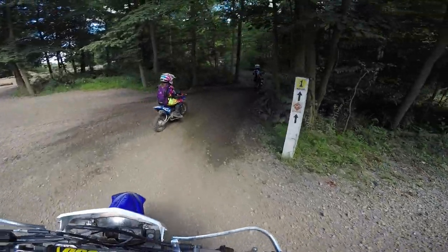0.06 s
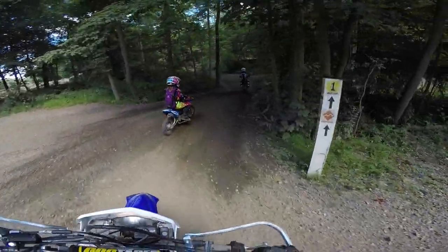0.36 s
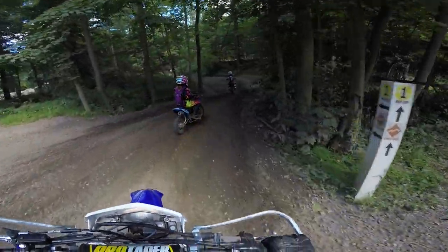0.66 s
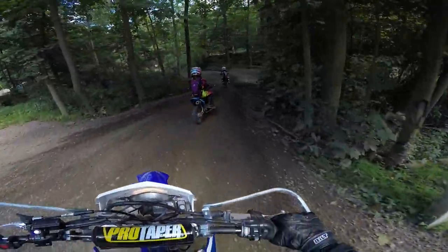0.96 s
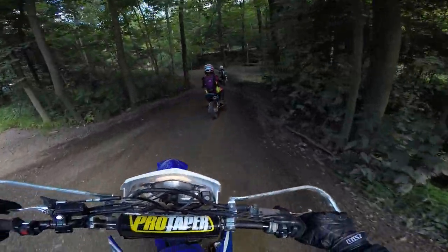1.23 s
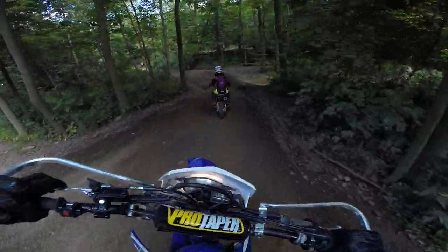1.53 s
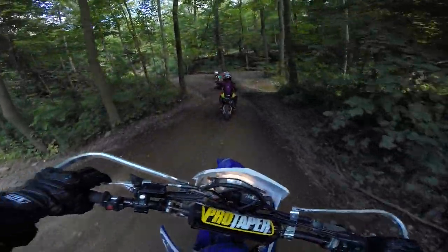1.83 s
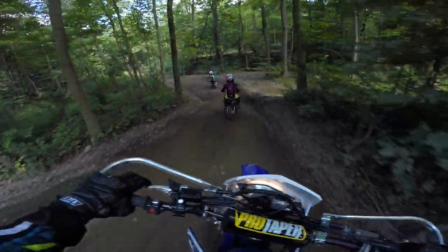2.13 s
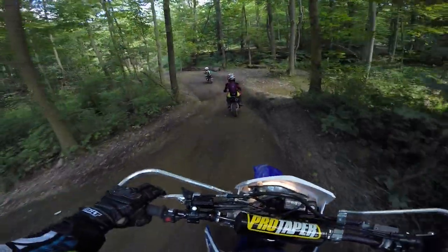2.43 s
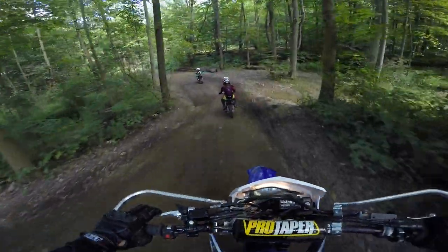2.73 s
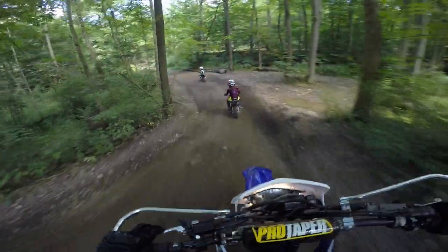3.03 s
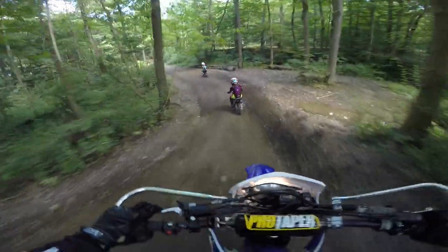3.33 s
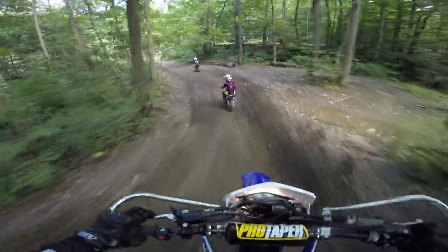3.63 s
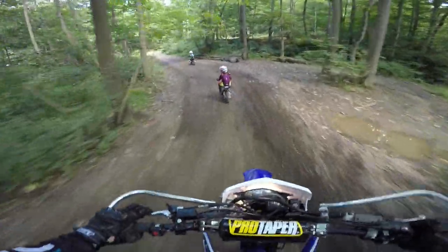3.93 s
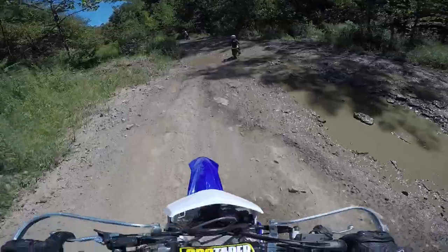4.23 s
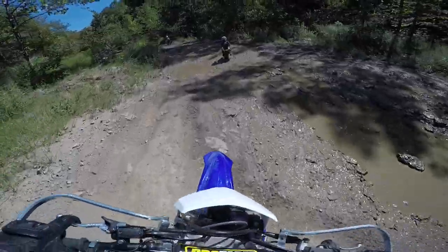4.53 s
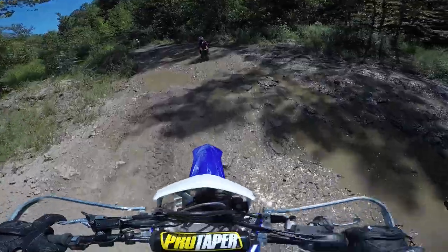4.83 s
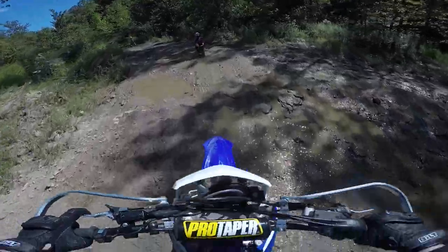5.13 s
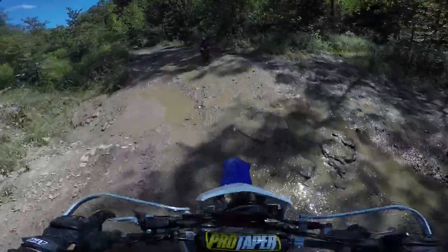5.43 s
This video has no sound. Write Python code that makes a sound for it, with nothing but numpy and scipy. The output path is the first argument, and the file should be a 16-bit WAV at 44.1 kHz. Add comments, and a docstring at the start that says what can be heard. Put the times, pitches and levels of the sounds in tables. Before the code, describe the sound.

Muffled, thumping putter of a single-cylinder dirt bike heard from the rider's helmet, with wind rumble, faint tyre hiss and light metal ticks.

```python
"""Dirt bike on a gravel trail

A single-cylinder four-stroke putters along, heard through a muffled helmet camera. Each burn thumps in
the exhaust, the hardest overload the microphone, and the intake gulps after every firing. Wind rumbles,
the chassis hums, tyres hiss and metal on the wheel ticks.
At 4.17 s the sound jumps abruptly, with a sharp click, to a rougher, stonier stretch."""
import sys
import numpy as np
from scipy import signal
from scipy.fft import rfft, irfft, next_fast_len
from scipy.io import wavfile

SR = 44100
rng = np.random.default_rng(int(sys.argv[2]) if len(sys.argv) > 2 else 0)


def waveform_to_disk(signal):
    """Save audio, clipped to [-1, 1], as 16-bit WAV at the path in sys.argv[1]."""
    frames = np.transpose(np.atleast_2d(signal))
    scaled = np.clip(frames, -1, 1) * 32767
    samples = np.round(scaled).astype(np.int16)
    wavfile.write(sys.argv[1], SR, samples)


N = 250047
TIME_S = np.arange(N) / SR
JUMP_S = 4.167

# steady camera case rings: freq_hz, width_hz, rms_db
CASE_RINGS = [(2830, 19, -71.5), (3130, 37, -80.5), (6360, 43, -78), (12617, 6, -85)]
# relative levels along the trail: time_s, wind_db, chassis_db, gravel_db
TRAIL_LEVELS = [(0, -21.5, -48.5, -54), (1.15, -21.5, -47, -52.5), (1.65, -28.5, -48, -52.5),
                (2.75, -21, -50, -53.5), (3.2, -20.5, -48.5, -53.5), (4.1, -24, -47, -52.5),
                (4.2, -22, -45, -50), (4.72, -18, -45.5, -47), (5.05, -28, -50, -50),
                (5.38, -20.5, -48.5, -52), (5.67, -24, -46.5, -49)]
# noise spectra: freq_hz, density_db
WIND_SPECTRUM = [(12, -28), (28, -7), (50, 1.5), (100, -3.5), (140, 7), (200, -3.5), (270, -0.5),
                 (330, -14), (380, -28), (600, -71)]
CHASSIS_SPECTRUM = [(200, -13), (330, 1.5), (420, 1), (470, -2.5), (530, -15), (700, -16.5), (1100, -22),
                    (1600, -36.5), (3000, -48)]
GRAVEL_SPECTRUM = [(600, -8), (1600, -10.5), (2200, 2), (2700, -2), (3700, 1), (4800, 6), (5300, -5.5),
                   (7500, -10), (8700, -19.5), (9500, -18.5), (12000, -30), (15000, -37.5)]
# resonances: freq_hz, width_hz, gain_db
CASE_MODES = [(2160, 420, -9.5), (3440, 86, -2.5), (3850, 300, 1.5), (4410, 260, 5), (4920, 55, -0.5),
              (6640, 140, -12.5), (9340, 390, -13)]
AIRBOX_MODES = [(270, 35, 0), (162, 130, -16.5)]
EXHAUST_MODES = [(261.2, 46.2, 4.5), (187.6, 23.5, 4), (69, 18, -14.5)]

# bouts of wheel ticking: start_s, length_s, first_db, last_db
TICK_BOUTS = [(0.04, 0.25, -32.5, -46.5), (0.3, .17, -44.5, -31.5), (1.079, 0.22, -31, -47),
              (4.188, 0.029, -37.5, -33.5), (4.328, 0.2, -34, -32.5), (4.59, 0.081, -36.5, -38),
              (4.884, 0.067, -31, -31), (5.053, .44, -37, -32.5), (5.554, .09, -36.5, -28.5)]
# tick pace, set by the wheel: time_s, ticks_per_s
TICK_RATE = [(0, 26.9), (1.3, 26.3), (4.3, 35), (5.67, 35.9)]
# main ring of a tick: time_s, pitch_hz
TICK_PITCH = [(0, 4440), (1.3, 4330), (4.2, 4520), (5.67, 4640)]
# lower tick rings, smooth stretch only: freq_hz, gain_db
TICK_LOW_MODES = [(2900, -11.5), (2000, -17)]

# engine speed: time_s, firings_per_s
FIRING_RATE = [(0.0, 20.28), (0.526, 20.772), (0.609, 19.881), (1.117, 22.595), (1.51, 22.263),
               (1.78, 25.398), (2.25, 20.761), (2.6, 24.413), (2.945, 21.055), (3.57, 21.557),
               (3.968, 24.253), (4.278, 24.808), (4.415, 23.105), (4.876, 24.299), (5.006, 31.381),
               (5.204, 24.233), (5.438, 21.931), (5.67, 32.498)]
# frame vibration: time_s, level_db
FRAME_SHAKE = [(0, -29), (1.8, -27.5), (2.35, -32), (3.7, -27.5), (4.5, -19), (4.83, -22.5), (5.04, -29.5),
               (5.18, -25), (5.67, -41)]
# airbox suction: time_s, level_db
SUCTION = [(0, -22.5), (4.15, -21), (4.19, -17), (4.76, -11), (4.85, -19.5), (5.67, -19.5)]
# burn strength: time_s, level_db
THROTTLE = [(0, 1.1), (.15, -0.26), (.74, -1.12), (.81, 1.14), (1.5, 0.07), (1.68, 0.6), (1.76, -1.95),
            (2.05, 0.5), (2.62, 0), (2.72, -1.4), (3.0, -1.15), (3.05, 0.4), (3.7, 0), (3.79, -1.83),
            (4.04, -1), (4.12, 1.5), (4.2, -3), (4.7, -4), (4.92, 1.96), (5.17, -1.98), (5.5, 1.67),
            (5.67, -0.96)]
# weak burns: time_s, loss_db
MISFIRES = [(.5, 2), (.89, 7), (1.07, 4.5), (1.34, 3.5), (2.06, 3), (2.2, 4), (2.91, 1.5), (3.28, 8),
            (3.52, 8), (4.16, 4.5), (4.35, 2), (4.44, 3.5), (4.49, 6.5), (4.57, -1), (4.78, 8),
            (5.15, 16.5), (5.27, 3), (5.4, 3)]
# hard burns: time_s, gain_db
BARKS = [(.21, 1), (.36, 1.5), (.55, 1.14), (.65, 1.2), (1.81, 1.6), (2.11, 1), (2.82, 1), (2.86, 1.37),
         (3.47, 0.6), (3.56, 2), (3.83, 1.6), (3.92, 2), (4.4, 2.5), (4.61, 4.5), (4.74, 4.5), (4.82, 3.1)]


def from_db(db):
    """Decibels to gain."""
    return 10 ** (np.asarray(db) / 20)


def unit_rms(x):
    """Scale to rms 1."""
    return x / np.sqrt(np.mean(x ** 2) + 1e-20)


def curves(table):
    """Value columns of a time table, per sample."""
    time_s, *columns = np.transpose(table)
    return [np.interp(TIME_S, time_s, column) for column in columns]


def low_pass(x, cutoff_hz, order):
    """Butterworth low-pass."""
    return signal.sosfilt(signal.butter(order, cutoff_hz, fs=SR, output="sos"), x + 1e-18)


def drift(rate_hz):
    """Random wander between unit-normal knots."""
    knots = rng.standard_normal(2000)
    return np.interp(TIME_S * rate_hz, np.arange(len(knots)), knots)


def noise(spectrum):
    """Shaped noise, rms 1."""
    freq_hz, density_db = np.transpose(spectrum)
    size = next_fast_len(N)
    bins_hz = np.arange(size // 2 + 1) * SR / size
    gain = from_db(np.interp(np.log(bins_hz + 1), np.log(freq_hz), density_db))
    return unit_rms(irfft(rfft(rng.standard_normal(size)) * gain, size)[:N])


def ring(x, freq_hz, width_hz):
    """Resonator: a unit click starts a decaying sine of height 1."""
    radius, step_rad = np.exp(-np.pi * width_hz / SR), 2 * np.pi * freq_hz / SR
    return signal.lfilter([0, np.sin(step_rad)], [1, -2 * radius * np.cos(step_rad), radius ** 2], x + 1e-18)


def puff_response(modes, top_hz):
    """A soft gas puff rings a cavity; adjacent modes alternate in sign."""
    puff = low_pass(signal.unit_impulse(SR // 8), top_hz, order=6)
    return sum((-1) ** k * from_db(db) * ring(puff, hz, width) for k, (hz, width, db) in enumerate(modes))


def pulse_train(onsets, gains, pitch_ratios, response):
    """One peak-normalised response per onset sample, each at its own gain and pitch."""
    out, age = np.zeros(N + len(response)), np.arange(len(response))
    for start, gain, ratio in zip(onsets, gains, pitch_ratios):
        out[start:start + len(age)] += gain * np.interp(age * ratio, age, response, right=0)
    return out[:N] / np.abs(response).max()


def cycle_onsets(cycles):
    """Samples at which an engine cycle completes."""
    return np.flatnonzero(np.diff(np.floor(cycles)) > 0)


def case_rings():
    """Vibration keeps sharp modes of the camera case ringing faintly."""
    return sum(from_db(db) * unit_rms(ring(rng.standard_normal(N), hz, width))
               for hz, width, db in CASE_RINGS)


def wind(cycles, lull_cycles=0.16, floor_db=-16, gust_db=2.6):
    """Rushing air churns behind each exhaust puff and is calmest at its front."""
    wake = np.sin(np.pi * (cycles - lull_cycles)) ** 2
    churn = low_pass(np.minimum(2 * wake, 1), cutoff_hz=120, order=2)
    gusts = from_db(gust_db * drift(rate_hz=36))
    return gusts * (from_db(floor_db) + churn) * noise(WIND_SPECTRUM)


def chassis(panel_db=-7.5, stony_boost_db=6, flutter_db=1.0):
    """Chassis noise and a loose panel that hums more on stony ground."""
    panel = unit_rms(ring(rng.standard_normal(N), freq_hz=467.3, width_hz=13))
    panel_gain = from_db(panel_db + stony_boost_db * (TIME_S > JUMP_S))
    flutter = from_db(flutter_db * drift(rate_hz=40))
    return flutter * (noise(CHASSIS_SPECTRUM) + panel_gain * panel)


def gravel(grains_per_s=900, grain_db=-8, case_db=-4, flutter_db=2.14):
    """Tyre hiss, plus crunching stones that ring the camera case."""
    sizes = from_db(2 * np.minimum(rng.exponential(1, N), 4)) * rng.choice([-1, 1], N)
    grains = sizes * (rng.random(N) < grains_per_s / SR)
    crunch = rng.standard_normal(N) + from_db(grain_db) * unit_rms(grains)
    case = unit_rms(sum(from_db(db) * width * ring(crunch, hz, width) for hz, width, db in CASE_MODES))
    return (noise(GRAVEL_SPECTRUM) + from_db(case_db) * case) * from_db(flutter_db * drift(rate_hz=70))


def stones(hits_per_s=9, impulse_db=-41, scatter_db=4, band_hz=(3000, 11000)):
    """On the stony stretch the tyres flick stones against the bike."""
    hits = (rng.random(N) < hits_per_s / SR) & (TIME_S > JUMP_S)
    clicks = hits * from_db(impulse_db + scatter_db * np.clip(rng.standard_normal(N), -2, 2))
    return signal.sosfilt(signal.butter(1, band_hz, "band", fs=SR, output="sos"), clicks + 1e-18)


def jump_click(gain_db=-21, decay_s=0.001):
    """A sharp click as the sound jumps abruptly to a rougher stretch."""
    age_s = TIME_S - JUMP_S
    pulse = (age_s > 0) * np.exp(-np.abs(age_s) / decay_s)
    return from_db(gain_db) * low_pass(pulse, cutoff_hz=2500, order=1)


def tick_schedule():
    """Evenly spaced ticks, level ramped over each bout: start_s, level_db."""
    for start_s, length_s, first_db, last_db in TICK_BOUTS:
        period_s = 1 / np.interp(start_s, *np.transpose(TICK_RATE))
        for age_s in np.arange(0, length_s, period_s):
            yield start_s + age_s, first_db + (last_db - first_db) * age_s / length_s


def wheel_ticks(swell_s=0.0012, decay_s=0.00303, scatter_hz=25, gain_db=2.5, scatter_db=1.5):
    """Each tick is a brief rub of metal that swells and rings out."""
    out, age_s = np.zeros(N + SR), TIME_S[:SR // 30]
    pitch_hz = curves(TICK_PITCH)[0]
    envelope = np.tanh(age_s / swell_s) ** 2 * np.exp(-age_s / decay_s)
    low_rings = sum(from_db(db) * np.sin(2 * np.pi * hz * age_s) for hz, db in TICK_LOW_MODES)
    draws = rng.standard_normal((200, 3))
    for (start_s, level_db), (pitch_draw, low_draw, level_draw) in zip(tick_schedule(), draws):
        onset = min(int(start_s * SR), N - 1)
        tone = np.sin(2 * np.pi * (pitch_hz[onset] + scatter_hz * pitch_draw) * age_s)
        if start_s < JUMP_S:
            tone += from_db(2 * low_draw) * low_rings
        gain = from_db(level_db + gain_db + scatter_db * level_draw)
        out[onset:onset + len(age_s)] += gain * envelope * tone
    return out[:N]


def frame(cycles, gain_db=-3):
    """The piston shakes the frame twice per cycle."""
    shake = np.sqrt(2) * np.cos(4 * np.pi * cycles)
    return from_db(curves(FRAME_SHAKE)[0] + gain_db) * low_pass(shake, cutoff_hz=350, order=4)


def intake(cycles, lag_cycles=0.3083, scatter_db=4, pitch_scatter=0.082, boom_hz=72, boom_width_hz=55):
    """The piston sucks in air after the exhaust opens: an airbox gulp and a deep boom."""
    onsets = cycle_onsets(cycles - lag_cycles)
    level_draws, pitch_draws = rng.standard_normal((N // 2, 2))[:len(onsets)].T
    gains = from_db(scatter_db * level_draws)
    pitch_ratios = 1 + pitch_scatter * pitch_draws
    gulp = puff_response(AIRBOX_MODES, top_hz=308)
    boom = -np.gradient(puff_response([(boom_hz, boom_width_hz, 0)], top_hz=263))
    gulps = pulse_train(onsets, gains * from_db(curves(SUCTION)[0][onsets]), pitch_ratios, gulp)
    return gulps + pulse_train(onsets, gains * from_db(-17), pitch_ratios, boom)


def burn_levels_db(onsets, scatter_db=0.4):
    """Burns follow the throttle; some misfire, some bark."""
    burn_db = curves(THROTTLE)[0][onsets] + scatter_db * rng.standard_normal(N)[:len(onsets)]
    for time_s, loss_db in MISFIRES:
        burn_db[np.argmin(np.abs(onsets / SR - time_s))] -= loss_db
    for time_s, gain_db in BARKS:
        burn_db[np.argmin(np.abs(onsets / SR - time_s))] += gain_db
    return burn_db


def exhaust(cycles, idle_note_hz=253.2, idle_firings_per_s=20, base_echo_s=0.005126, echo_gain=0.71):
    """One puff per burn rings the pipe; the open end reflects it inverted."""
    onsets = cycle_onsets(cycles)
    direct = -puff_response(EXHAUST_MODES, top_hz=354)
    age_s = TIME_S[:len(direct)]
    thump = direct - echo_gain * np.interp(age_s - base_echo_s, age_s, direct, left=0)
    extra_firings_per_s = curves(FIRING_RATE)[0][onsets] - idle_firings_per_s
    note_hz = idle_note_hz + 2.4 * extra_firings_per_s  # hotter gas raises the note
    note_hz *= 1 + 0.02 * (onsets / SR > JUMP_S)
    gains = from_db(burn_levels_db(onsets) - 0.13)
    return pulse_train(onsets, gains, note_hz / EXHAUST_MODES[0][0], thump)


def scene(start_cycles=0.7, jump_cycles=0.3):
    """Mono mix at the rider's head."""
    cycles = start_cycles + np.cumsum(curves(FIRING_RATE)[0]) / SR
    cycles += jump_cycles * (TIME_S > JUMP_S)  # the beat skips ahead once
    wind_db, chassis_db, gravel_db = curves(TRAIL_LEVELS)
    air = from_db(wind_db - 2.5) * wind(cycles)
    hum = from_db(chassis_db + 4.5) * chassis()
    tyres = from_db(gravel_db - 3.5) * gravel() + stones()
    engine = exhaust(cycles) + intake(cycles) + frame(cycles)
    return (air + hum + tyres + case_rings() + wheel_ticks() + jump_click() + engine)[None]


def record(dry, knee=0.78, headroom=0.17, stopband_hz=16112):
    """Microphone overload rounds peaks above the knee; a steep low-pass cuts the top."""
    linear = np.clip(dry, -knee, knee)
    rounded = linear + headroom * np.tanh((dry - linear) / headroom)
    return signal.sosfilt(signal.cheby2(12, 60, stopband_hz, fs=SR, output="sos"), rounded)


dry = scene()
out = record(dry)
waveform_to_disk(out)
```